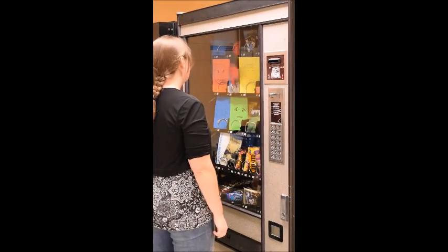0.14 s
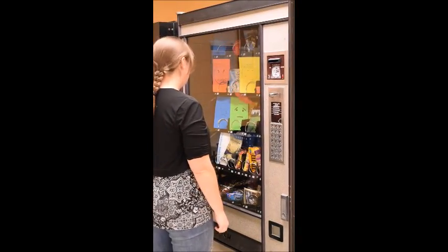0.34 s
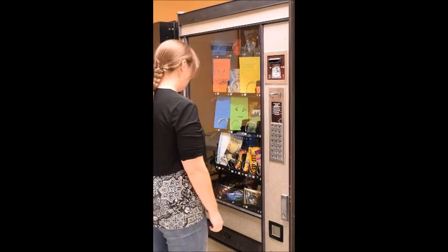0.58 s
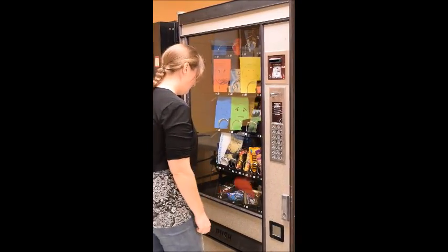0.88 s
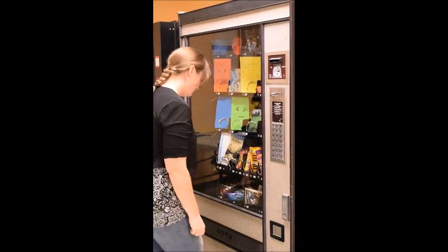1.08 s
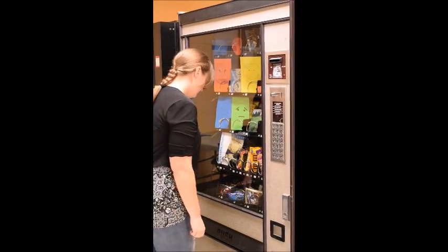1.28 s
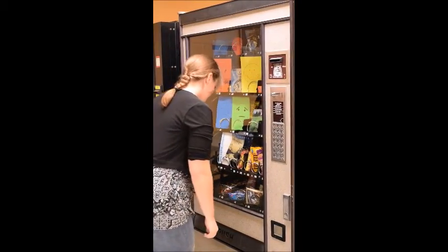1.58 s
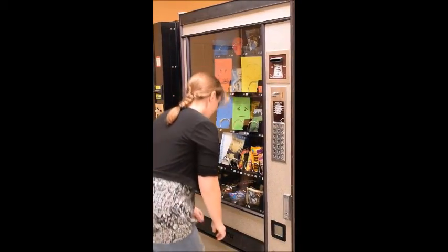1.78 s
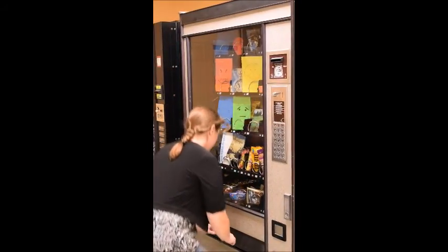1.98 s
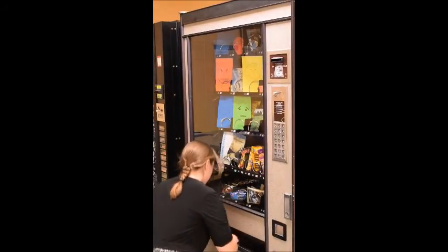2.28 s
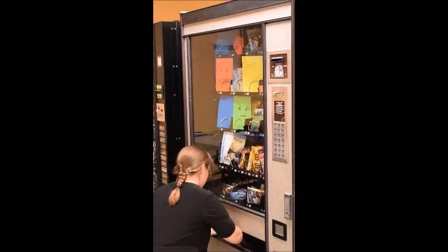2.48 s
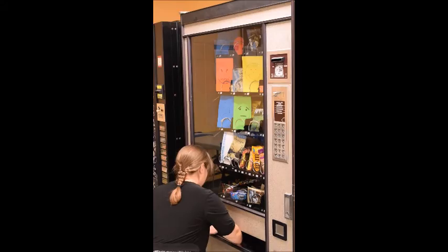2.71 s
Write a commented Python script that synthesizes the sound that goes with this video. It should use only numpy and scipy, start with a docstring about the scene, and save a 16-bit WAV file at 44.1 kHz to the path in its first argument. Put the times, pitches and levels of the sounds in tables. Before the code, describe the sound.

Small metallic rattling roll speeds up and stops over vending machine hum, then the delivery flap bangs

```python
"""A vending machine's hum and fan rush are heard first, with a small metallic thing, likely a coin in
the return cup, rolling to and fro ever faster until it settles. Then the delivery flap is pushed open:
it knocks, clacks against its stop, bumps again and squeaks on its hinge; cloth rustles faintly.
Impacts and rolling are shaped noise exciting resonators, squeaks are gliding tones, the hum is a set
of wavering lines over coloured noise, and a hard-walled room adds diffuse reverberation."""
import sys
import numpy as np
from scipy import signal
from scipy.fft import rfft, irfft
from scipy.io import wavfile

SR = 44100
rng = np.random.default_rng(int(sys.argv[2]) if len(sys.argv) > 2 else 0)


def unload_wav(signal):
    """Save mono or channel-first audio to the path in sys.argv[1] as 16-bit WAV at rate SR, clipped to [-1, 1]."""
    wavfile.write(
        sys.argv[1],
        SR,
        np.round(np.clip(np.atleast_2d(signal).T, -1, 1) * 32767).astype(np.int16),
    )


N = 125685
T = np.arange(N) / SR  # time axis, s

# blows of the flap: t/s, rise/s, fall/s, thud level/dB, panel level/dB, tap level/dB, click level/dB
FLAP_KNOCKS = [(1.975, .001, 0.0047, -28, -29.5, -25, -47), (1.985, .003, 0.017, -34, -29.5, -41, -58),
               (2.014, .002, 0.011, -45, -38, -34.5, -41), (2.031, .002, .005, -35, -34, -36, -41),
               (2.039, 0.0003, 0.0029, -39, -29, -33, -15), (2.051, .001, 0.0066, -41, -27, -30, -21.5),
               (2.06, 0.0034, 0.0036, -37, -17, -32, -30), (2.066, 0.0024, 0.0071, -24.5, -22, -36, -45),
               (2.08, 0.0032, 0.017, -24.5, -27, -46, -54), (2.216, 0.0023, 0.012, -27, -46, -50, -47.5),
               (2.236, .002, 0.011, -45, -50, -50, -47), (2.272, 0.0038, .01, -45, -37, -58, -53),
               (2.298, 0.0023, 0.0098, -31, -28, -55, -50), (2.329, 0.0074, 0.014, -26.5, -24, -36, -44),
               (2.341, 0.0034, 0.0059, -37, -27, -45, -44), (2.383, 0.0025, 0.0093, -30, -38, -49, -60),
               (2.423, 0.0042, 0.011, -20.5, -42, -46, -58), (2.457, .003, .012, -39, -41, -62, -69),
               (2.484, .002, 0.007, -46, -36, -57, -60)]
# relative spectrum of the cabinet thud: f/Hz, density level/dB
THUD_SPECTRUM = [(40, -18), (110, 2), (250, 9), (500, -5), (900, -35), (2000, -64)]
# relative spectrum of the panel: f/Hz, density level/dB
PANEL_SPECTRUM = [(250, 1.5), (700, 4), (1000, -0.5), (1450, 7), (2200, 0), (2800, -9), (4000, -19),
                  (5300, -36), (8000, -42), (15000, -50)]
# relative spectrum of the light tap: f/Hz, density level/dB
TAP_SPECTRUM = [(1200, 3), (2400, 9), (3400, -1.5), (4600, -3), (5150, 7.5), (5500, -6), (6000, 4.5),
                (7800, -3.5), (9000, -11), (12500, -16), (15500, -31)]
# relative spectrum of the hard click, also of the squeaks' hiss: f/Hz, density level/dB
CLICK_SPECTRUM = [(1500, -14), (3500, -20), (5400, -11), (6500, 1), (8000, -4), (9700, -5), (11000, -9.5),
                  (12500, -19), (15500, -28)]
# resonances of the flap: f/Hz, bandwidth/Hz, relative level/dB
FLAP_MODES = [(610, 15, -0.5), (752.7, 10, 3), (885, 35, -5), (1304, 21, 3), (1427, 64, 0.5),
              (1667, 40, 0.5), (1770, 35, -10), (2113, 58, -4.5), (2530, 70, -14)]
FLAP_RING_DB = -3.5  # ringing relative to the panel excitation
RATTLE_DB, RATTLE_HZ = 1, 180  # spread and corner rate of the panel's random level


def flap():
    """Impact excitation: each blow mixes thud, panel, tap and click, and the panel force rings modes."""
    power = 0
    for t, rise, fall, *levels_db in FLAP_KNOCKS:
        power = power + (from_db(levels_db)[:, None] * swell(t, rise, fall)) ** 2
    thud, panel, tap, click = np.sqrt(power)
    panel = panel * rms_one(from_db(RATTLE_DB * drift(RATTLE_HZ)))
    blows = 0
    for force, spectrum in ((thud, THUD_SPECTRUM), (panel, PANEL_SPECTRUM),
                            (tap, TAP_SPECTRUM), (click, CLICK_SPECTRUM)):
        blows = blows + force * colour(rng.standard_normal(N), spectrum)
    ringing = ring(panel * rng.standard_normal(N), FLAP_MODES)
    return blows + from_db(FLAP_RING_DB) * ringing


# brief squeaks and rubs: t/s, length/s, middle f/Hz, glide/octaves, level/dB
SQUEAK_EVENTS = [(0.796, 0.045, 912, .4, -39), (.845, 0.037, 1520, .55, -35.5),
                 (1.537, 0.029, 1485, 0.063, -38), (2.355, .035, 3214, 0, -44.5),
                 (2.422, 0.023, 1450, -0.1, -38.5), (2.581, 0.03, 1403, -0.026, -29)]
SQUEAK_ATTACK_S = 0.0019
SQUEAK_ROUGHNESS = 0.04  # random pitch spread as a share of the frequency
SQUEAK_HISS_DB = -24.5  # relative to the chirp


def squeaks():
    """Stick-slip friction: a rough gliding tone with a little hiss."""
    out = 0
    rough = drift(250)
    hiss = colour(rng.standard_normal(N), CLICK_SPECTRUM)
    for t, length, hz, glide, db in SQUEAK_EVENTS:
        progress = np.clip((T - t) / length, 0, 1)
        pitch = hz * 2 ** (glide * (progress - 0.5)) * (1 + SQUEAK_ROUGHNESS * rough)
        chirp = np.sqrt(2) * np.sin(2 * np.pi * np.cumsum(pitch) / SR)
        attack = np.clip((T - t) / SQUEAK_ATTACK_S, 0, 1)
        envelope = attack * np.sqrt(1 - progress ** 2)
        out = out + from_db(db) * envelope * (chirp + from_db(SQUEAK_HISS_DB) * hiss)
    return out


# peaks of the coin's swings: t/s, relative level/dB
COIN_SWINGS = [(.002, -2), (0.091, -1), (0.181, -1), (.268, -1.5), (0.354, -3), (0.434, -1), (0.512, -1.5),
               (.588, -1.5), (.662, -3.5), (.732, -3.5), (.797, -1), (0.857, 0.5), (0.923, -2.5),
               (.979, -1), (1.037, -3), (1.093, -1.5), (1.146, -4), (1.195, -2), (1.241, -3.5),
               (1.286, -1.5), (1.326, -2.5), (1.362, -2.5), (1.398, -3), (1.431, -2.5), (1.455, -6),
               (1.472, -2), (1.484, -8.5)]
# relative spectrum of the rolling noise: f/Hz, density level/dB
ROLL_SPECTRUM = [(900, -18), (1600, 3.5), (2400, 2), (2900, -11.5), (4000, 0), (4900, -3), (5700, 4),
                 (6600, -3.5), (7700, -0.5), (9200, -11), (11500, -6), (13000, -10.5), (14700, -12.5),
                 (15600, -15)]
# resonances of coin and cup: f/Hz, bandwidth/Hz, relative level/dB
CUP_MODES = [(2029, 35, 9), (2338, 50, 5), (2460, 23, 2), (3803, 36, -1), (4500, 35, -1.5), (5470, 200, -6),
             (5630, 120, -6.5), (6210, 80, -4.5), (6130, 63, -8.5), (6950, 61, -1.5), (7500, 140, 2.5),
             (7800, 50, -3), (8030, 50, -11.5), (8280, 66, -4), (10280, 120, -10.5), (11450, 74, -6),
             (12300, 120, -11), (14400, 200, -16)]
SWING_RISE_S, SWING_FALL_S = 0.012, 0.022  # at t = 0
SWING_SHORTENING = 0.15  # exponential rate of both times, 1/s
ROLL_FLOOR_DB = -32  # steady rolling under the swings, up to the last peak
ROLL_GRAIN_DB = 4  # spread of the contacts' random level
ROLL_DB, CUP_DB = -34.5, -36  # gains of rolling noise and ringing


def coin():
    """Rolling contact: the rim swings ever faster; its tiny contacts hiss and ring coin and cup."""
    power = from_db(ROLL_FLOOR_DB) ** 2 * (T < COIN_SWINGS[-1][0])
    for t, db in COIN_SWINGS:
        shrink = np.exp(-SWING_SHORTENING * t)
        swing = from_db(db) * swell(t, SWING_RISE_S * shrink, SWING_FALL_S * shrink)
        power = power + swing ** 2
    speed = np.sqrt(power)
    contacts = rms_one(rng.standard_normal(N) * from_db(ROLL_GRAIN_DB * drift(1100)))
    hiss = speed * colour(contacts, ROLL_SPECTRUM)
    ringing = ring(speed * contacts, CUP_MODES)
    return from_db(ROLL_DB) * hiss + from_db(CUP_DB) * ringing


# refrigeration hum: f/Hz, rms level/dB, waver as a share of the level
HUM_LINES = [(58.7, -54.5, .3), (176.05, -36, 0.19), (222.6, -37.5, 0.75), (292, -44.5, 0.28),
             (350.7, -41.5, 0.32), (528.6, -50, 0.37), (651, -50.5, 0.62)]
# relative spectrum of fan and room noise: f/Hz, density level/dB
FAN_SPECTRUM = [(20, -33), (40, -9), (85, -8), (150, -2.5), (240, 0), (420, -7.5), (650, -14.5),
                (1200, -15.5), (2000, -26), (3200, -33.5), (6000, -44.5), (10000, -54), (15500, -65)]
# course of the fan noise: t/s, rms level/dB
FAN_LEVEL = [(0, -29), (1.5, -30), (1.9, -30), (2.3, -29.5), (2.85, -30.5)]
# course of one hum line that swells: t/s, rms level/dB
DRONE_LEVEL = [(2.0, -54), (2.15, -33), (2.29, -28.5), (2.85, -28)]
DRONE_HZ, DRONE_WAVER = 175.6, 0.25
# the compressor motor slips against the mains, so their two lines beat
MAINS_HZ, SLIP_HZ, BEAT_PEAK_S = 120.0, 2.95, 0.43
MAINS_DB, MOTOR_DB, BEAT_WAVER = -40.5, -36.5, 0.14


def cooler():
    """Superposition and beating: wavering compressor lines over the broadband rush of the fan."""
    out = level(FAN_LEVEL) * colour(rng.standard_normal(N), FAN_SPECTRUM)
    for hz, db, waver in HUM_LINES:
        out += from_db(db) * tone(hz, waver, rng.random())
    out += from_db(MAINS_DB) * tone(MAINS_HZ, BEAT_WAVER, BEAT_PEAK_S)
    out += from_db(MOTOR_DB) * tone(MAINS_HZ - SLIP_HZ, BEAT_WAVER, BEAT_PEAK_S)
    return out + level(DRONE_LEVEL) * tone(DRONE_HZ, DRONE_WAVER, rng.random())


HUM_WAVER_HZ = 5.3  # corner rate of the waver


def tone(hz, waver, peak_s):
    """Random modulation of a line: rms 1, crest at peak_s but for the sway of amplitude and phase."""
    sway = rms_one(1 + waver * (drift(HUM_WAVER_HZ) + 1j * drift(HUM_WAVER_HZ)))
    return np.sqrt(2) * np.real(sway * np.exp(2j * np.pi * hz * (T - peak_s)))


# course of the clothing rustle: t/s, rms level/dB
RUSTLE_LEVEL = [(1.45, -67), (1.75, -61), (1.95, -59), (2.4, -67), (2.7, -68)]
# relative spectrum of the rustle: f/Hz, density level/dB
RUSTLE_SPECTRUM = [(1500, -16), (5000, 3), (9500, 2), (15500, -13)]


def rustle():
    """Sliding friction as broadband noise: cloth moves as someone bends to the flap."""
    return level(RUSTLE_LEVEL) * colour(rng.standard_normal(N), RUSTLE_SPECTRUM)


# reverberation time of the room: f/Hz, time to fall by 60 dB/s
ROOM_DECAY = [(150, 1), (1500, 0.47), (6000, 0.37), (10000, 0.27), (15000, 0.26)]
ROOM_BUILD_S = 0.0027  # time constant of the tail's onset


def room(x):
    """Diffuse reverberation: convolution with noise whose bands decay faster toward the treble."""
    t, f = T[:SR], np.fft.rfftfreq(SR, 1 / SR)  # a one-second tail
    white = rfft(rng.standard_normal(SR))
    edges = np.geomspace(100, 20000, 28)
    tail = 0
    for low, high in zip(edges, edges[1:]):
        band = irfft(white * ((f >= low) & (f < high)), SR)
        t60 = at_hz(ROOM_DECAY, np.sqrt(low * high))
        tail = tail + band * from_db(-60 * t / t60)
    tail = tail * (1 - np.exp(-t / ROOM_BUILD_S))
    return signal.fftconvolve(x, tail / np.linalg.norm(tail))[:N]


def ring(x, modes):
    """Modal synthesis: parallel resonances that keep the overall level of white noise."""
    out = 0
    x = x + 1e-18  # tiny offset
    for hz, width, db in modes:
        r = np.exp(-np.pi * width / SR)  # pole radius
        poles = [1, -2 * r * np.cos(2 * np.pi * hz / SR), r * r]
        gain = from_db(db) * np.sqrt((1 - r * r) / 2)
        out = out + gain * signal.lfilter([1, 0, -1], poles, x)
    return out / np.linalg.norm(from_db(np.array(modes)[:, 2]))


def swell(peak_s, rise, fall):
    """Exponential growth and decay: rise to 1 at peak_s, then fall."""
    before = (peak_s - T) / max(rise, 1e-4)
    after = (T - peak_s) / max(fall, 1e-4)
    return np.exp(-np.minimum(np.maximum(before, after), 40))


def colour(x, spectrum):
    """Spectral shaping: filter a noise by a relative spectrum, then scale to rms 1."""
    gain = from_db(at_hz(spectrum, np.fft.rfftfreq(N, 1 / SR)))
    return rms_one(irfft(rfft(x) * gain, N))


def drift(rate_hz):
    """Low-pass noise: random motion of rms 1, mostly slower than rate_hz."""
    f = np.fft.rfftfreq(2 * N, 1 / SR)
    spectrum = rfft(rng.standard_normal(2 * N)) / (1 + (f / rate_hz) ** 2)
    return rms_one(irfft(spectrum)[:N])


def at_hz(points, hz):
    """Interpolation of a table on a logarithmic frequency axis."""
    f, values = np.transpose(points)
    return np.interp(np.log(np.maximum(hz, 1)), np.log(f), values)


def level(rows):
    """Level course: gain over time, linear in decibels between points."""
    return from_db(np.interp(T, *np.transpose(rows)))


def rms_one(x):
    """Power normalisation: scale to rms 1."""
    return x / np.sqrt(np.mean(np.abs(x) ** 2) + 1e-20)


def from_db(db):
    """Decibel law: level to amplitude gain."""
    return 10 ** (np.asarray(db) / 20)


COIN_ROOM_DB, FLAP_ROOM_DB = -5.5, -6.5  # sends into the reverberation


def scene():
    """Superposition: flap and coin, direct and reverberant, over rustle and cooler."""
    door = flap() + squeaks()
    rolling = coin()
    wet = room(from_db(COIN_ROOM_DB) * rolling + from_db(FLAP_ROOM_DB) * door)
    return (door + rolling + wet + rustle() + cooler())[None]


def record(dry):
    """Band limiting: an elliptic low-pass cuts the top steeply at 15850 Hz."""
    lowpass = signal.ellip(12, 0.1, 80, 15850, fs=SR, output="sos")
    return signal.sosfilt(lowpass, dry)


dry = scene()
out = record(dry)
unload_wav(out)
```